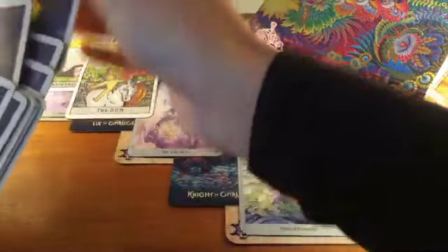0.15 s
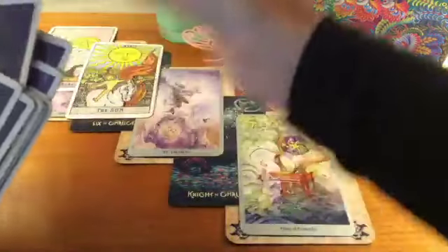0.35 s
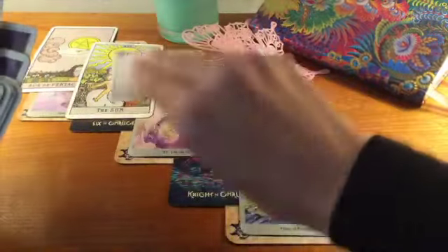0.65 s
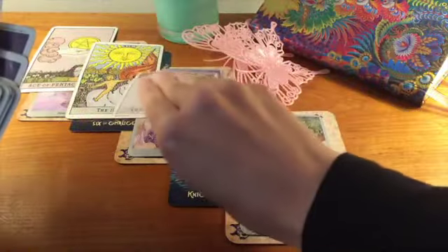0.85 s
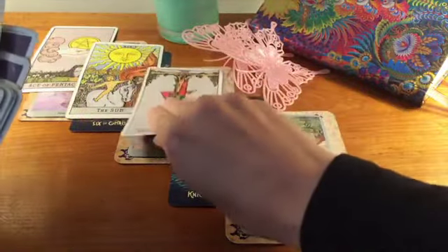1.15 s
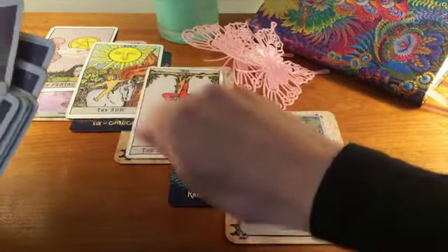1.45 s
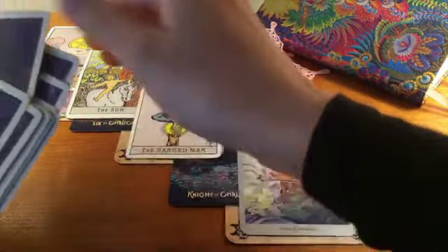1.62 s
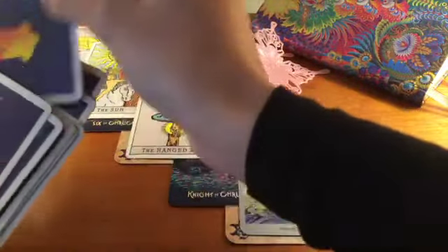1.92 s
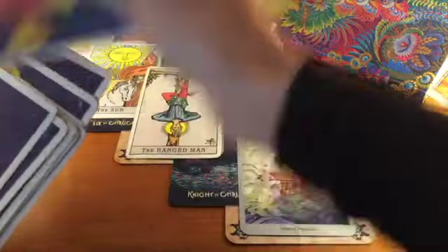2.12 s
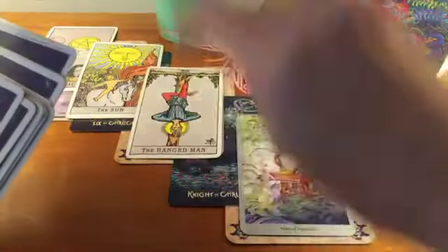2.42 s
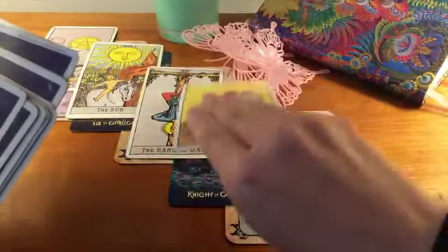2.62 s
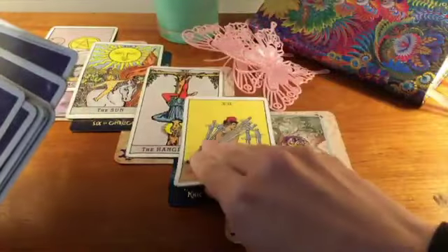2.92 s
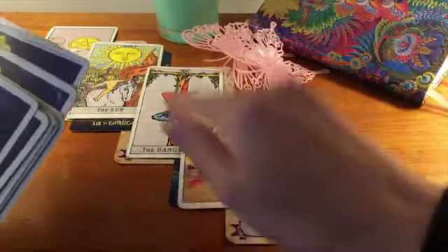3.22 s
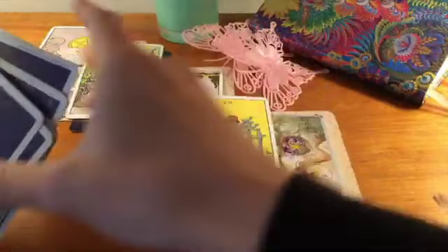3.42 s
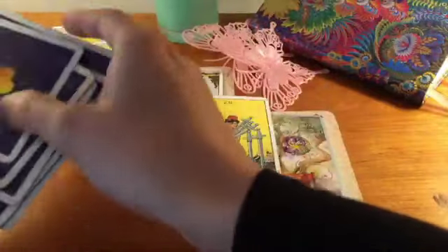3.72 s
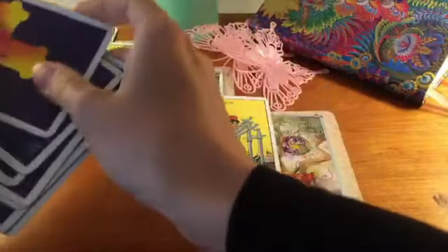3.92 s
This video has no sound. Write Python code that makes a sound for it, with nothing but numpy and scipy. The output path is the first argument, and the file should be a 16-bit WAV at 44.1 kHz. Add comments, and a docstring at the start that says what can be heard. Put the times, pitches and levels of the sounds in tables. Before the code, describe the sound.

Close to the microphone, stiff cards are thumbed off a fanned deck with a grainy rasp and a dull tap on wood. A loud crisp snap follows at about 1.5 seconds, then a fuller double slap near 2.3 and a smaller one near 3.2, with faint slides to the end. Small, nearly dry room; low unsteady hum and soft hiss beneath.

```python
"""A low hum wavers and a faint hiss runs throughout, made of shaped noise, in a small room of delays.
Stiff cards thumbed off a fanned deck rasp over each other in the first half second: dense tiny slips.
Near 1.5 s one snaps free loudly, near 2.3 s a bunch slaps down, near 3.2 s another; fainter slides follow.
Snaps are dying bursts of noise that ring the card; blows ring the wooden table top with a thud."""
import sys
import numpy as np
from scipy import signal
from scipy.fft import rfft, irfft
from scipy.io import wavfile

SR = 44100
rng = np.random.default_rng(int(sys.argv[2]) if len(sys.argv) > 2 else 0)


def ratio(d):
    """dB to gain"""
    e = np.asarray(d, float) / 20
    return 10 ** e


def master(y):
    """Save y as 16-bit WAV."""
    cut = np.clip(np.atleast_2d(y).T, -1, 1)
    pcm = np.round(cut * 32767)  # scale
    wavfile.write(sys.argv[1], SR, pcm.astype(np.int16))


N = 178825   # length in samples


def rms_one(x):
    """Scale a sound to an average (rms) level of 1."""
    return x / np.sqrt(np.mean(x ** 2) + 1e-20)


def in_time(rows):
    """Join the points of a table with straight lines: one curve per column, at every sample."""
    seconds, *columns = np.transpose(rows)
    return np.array([np.interp(np.arange(N) / SR, seconds, column) for column in columns])


def band(x, low_hz, high_hz):
    """Keep only the sound between two pitches."""
    edges = [low_hz, min(high_hz, 0.45 * SR)]
    return signal.sosfilt(signal.butter(2, edges, "band", fs=SR, output="sos"), x)


def ring(x, hz, t60):
    """A resonance: a unit click starts a sine near height 1 that falls 60 dB in t60 seconds."""
    r = ratio(-60 / (max(t60, 0.002) * SR))
    w = 2 * np.pi * hz / SR
    return signal.lfilter([0, np.sin(w)], [1, -2 * r * np.cos(w), r * r], x + 1e-18)


def drift(rate_hz):
    """Random wandering of spread 1: noise smoothed twice, so that little is left above rate_hz."""
    r = np.exp(-2 * np.pi * rate_hz / SR)
    smooth = signal.lfilter([1], [1, -2 * r, r * r], rng.standard_normal(N + SR))
    return rms_one(smooth[SR:])   # the first second lets the filter settle


# Colour of the room tone and hiss.
# Each row: frequency in Hz, relative strength in dB per Hz.
ROOM_COLOUR = [(15, -31), (25, -29), (61, -4), (144, -2), (164, -4), (246, -11), (399, -11), (1050, -22),
               (1850, -21.5), (2060, -23), (6380, -26), (13900, -29.5), (15500, -27.5)]
ROOM_TONE_DB = -62


def room_tone():
    """Steady noise with the colour of the quiet room and the hiss."""
    hz, db = np.transpose(ROOM_COLOUR)
    bins_hz = np.maximum(np.arange(N // 2 + 1) * SR / N, 1)
    strength = ratio(np.interp(np.log(bins_hz), np.log(hz), db))
    noise = irfft(rfft(rng.standard_normal(N)) * strength, N)
    return ratio(ROOM_TONE_DB) * rms_one(noise)


# How loud the hum is, before its random waver.
# Each row: time in seconds, level of the lower band in dB, level of the upper band in dB.
HUM_LEVELS = [(0.0, -72, -59.5), (1.0, -69, -61), (1.4, -58, -57.5), (1.8, -73, -64.5), (2.8, -63, -60),
              (3.299, -68, -70), (3.52, -60, -71), (3.72, -56.5, -77), (3.9, -63, -57.5), (4.05, -73, -65)]
# Where the two hum bands lie.
# Each row: centre in Hz, width of one pass through the resonance in Hz.
HUM_RESONANCES = [(64, 35), (142, 52)]
HUM_WAVER_DB, HUM_WAVER_HZ = 2.5, 3   # spread of the random waver and how fast it moves


def hum():
    """Noise sent twice through each of two low resonances, with a level that wavers."""
    out = 0
    for (hz, width_hz), level_db in zip(HUM_RESONANCES, in_time(HUM_LEVELS)):
        t60 = np.log(1000) / (np.pi * width_hz)   # a narrow resonance rings longer
        level = ratio(level_db + HUM_WAVER_DB * drift(HUM_WAVER_HZ))
        once = ring(rng.standard_normal(N), hz, t60)
        out = out + level * rms_one(ring(once, hz, t60))
    return out


ROOM_T60_S = 0.32     # time for the deep part of the echo to fall 60 dB
WALL_CUT_HZ = 10100   # each round through a delay softens the sound above this


def room(x):
    """Echoes off the walls: twelve feedback delays, duller on every round."""
    out = np.zeros(N)
    dull = np.exp(-2 * np.pi * WALL_CUT_HZ / SR)
    lags = (np.geomspace(0.007, 0.037, 12) * SR).astype(int)   # 7 to 37 ms
    for k, lag in enumerate(lags):
        loop, state = x.copy(), [0.]
        gain = ratio(-60 * lag / SR / ROOM_T60_S)
        for i in range(lag, N, lag):   # one delay length at a time
            back, state = signal.lfilter([gain * (1 - dull)], [1, -dull], loop[i - lag:i], zi=state)
            loop[i:i + lag] += back[:N - i]
        out += (loop - x) * (-1) ** k   # only the echoes, with alternating sign
    return out


# Notes (modes) of the wooden table top.
# Each row: frequency in Hz, relative strength in dB, time to fall 60 dB in seconds.
TABLE_MODES = [(64.3, -3.5, 0.12), (143.3, 1, 0.11), (223, -5, 0.034), (293.4, -4.5, 0.043),
               (400, 0, 0.032), (517.6, -20.5, 0.13)]
# Cards and fingers landing on the wood, before the soft contact dulls them.
# Each row: time in seconds, thud in dB (drives the second mode), knock in dB (drives all the others).
BLOWS = [(0.183, -53, -48), (0.331, -68, -47.5), (0.458, -36.5, -33.5), (0.469, -40, -41.5),
         (1.012, -44.5, -65), (1.419, -50, -74), (1.542, -40.5, -42.5), (2.172, -39.5, -46),
         (2.283, -50, -22.5), (2.314, -37, -36.5), (2.355, -48.5, -44), (2.583, -42.5, -76),
         (2.806, -46.5, -65), (2.926, -53, -51.5), (3.228, -39.5, -38.5), (3.682, -49.5, -58)]
LOWEST_MODE_DB = -19   # drive of the lowest mode, against the knock


def table():
    """Each blow on the wood rings its modes; from the third up they take new strengths each time."""
    seconds, thud_db, knock_db = np.array(BLOWS).T
    out = np.zeros(N)
    change_db = rng.normal(0, 2, (len(seconds), len(TABLE_MODES)))
    for k, (hz, level_db, t60) in enumerate(TABLE_MODES):
        if k == 0:
            blow_db = knock_db + LOWEST_MODE_DB
        elif k == 1:
            blow_db = thud_db
        else:
            blow_db = knock_db + change_db[:, k]
        blows = np.zeros(N)
        blows[np.round(seconds * SR).astype(int)] = ratio(blow_db + level_db)
        if k == 0:   # the heavy lowest mode swells over a few cycles
            blows = 3.3 * np.sin(2 * np.pi * hz / SR) * ring(blows, hz, 0.067)
        out += (-1) ** k * ring(blows, hz, t60)
    soft = signal.lfilter([0.08], [1, -0.92], out)   # a soft contact takes the edge off
    return signal.sosfilt(signal.butter(2, 40.0, "high", fs=SR, output="sos"), soft)


# Notes (modes) that ring briefly in the flexing card.
# Each row: frequency in Hz, relative strength in dB, time to fall 60 dB in seconds.
CARD_MODES = [(880, -73, 0.004), (1320, 6, 0.083), (1800, 23.5, 0.0029), (2620, 2, 0.047), (2990, 2, 0.018),
              (3780, 17.5, 0.0037), (4800, 4, 0.0024), (6650, -19, 0.024)]


def card_modes(x, strengths):
    """The stiff card bends in several modes at once, each ringing at its own pitch."""
    return sum(g * ratio(db) * ring(x, hz, t60) for (hz, db, t60), g in zip(CARD_MODES, strengths))


def colour(direct, modes, flex, share, flex_share):
    """Split contact noise and card ring into rasp, body and hiss; the flexing resonance joins the rasp."""
    sound = rms_one(direct) + share * rms_one(modes)
    rasp = rms_one(band(sound, 1810, 7250)) + flex_share * rms_one(flex)
    body = band(sound, 605, 3450)
    hiss = band(sound, 3490, 13060)
    return [rasp, body, hiss]


def grains(per_s, spread_db):
    """Random micro-slips of uneven size and sign."""
    size_db = spread_db * np.minimum(rng.exponential(1, N), 4)
    sizes = ratio(size_db) * rng.choice([-1, 1], N)
    return sizes * (rng.random(N) < per_s / SR)


# Card sliding over card, one stroke a row.
# Each row: time of the peak in seconds, rasp in dB, swell in seconds, release in seconds,
# brightness in dB, pitch of the card's free flap in Hz.
SLIDE_STROKES = [(0.12, -61.5, .12, 0.055, 8.5, 2900), (0.16, -49.5, 0.06, 0.038, 6.5, 2950),
                 (0.185, -48, 0.055, 0.058, 1.5, 2750), (0.358, -64, 0.013, .015, -8, 3040),
                 (0.425, -43.5, 0.064, 0.052, -0.5, 3280), (0.447, -37, 0.048, .025, -2.5, 3300),
                 (0.468, -33.5, 0.039, 0.016, -5.5, 2290), (0.49, -57.5, 0.023, 0.14, -7, 2390),
                 (0.57, -65, 0.2, 0.34, 6.5, 2260), (0.858, -78, .08, 0.062, 15.5, 2000),
                 (1.44, -71.5, 0.057, 0.11, -11.5, 1800), (1.529, -47.5, 0.044, .012, -5, 1600),
                 (1.539, -41.5, 0.019, 0.0077, 8, 2470), (1.57, -62.5, .03, 0.24, 3.5, 2700),
                 (1.83, -61, 0.023, 0.14, -2, 2890), (1.95, -65, .04, .06, -5, 2620),
                 (2.03, -52, 0.12, 0.093, 3, 3200), (2.148, -55.5, 0.068, .05, -3.5, 2700),
                 (2.173, -46.5, .01, 0.017, -7, 1970), (2.235, -43, 0.055, 0.044, -1.5, 2900),
                 (2.262, -35, 0.048, 0.033, -3.5, 2400), (2.286, -36.5, 0.013, 0.027, -1, 1630),
                 (2.33, -53.5, .03, .2, 1, 1800), (2.85, -70, .03, 0.23, -5, 2500),
                 (3.15, -62.5, 0.12, 0.15, -3, 1900), (3.223, -46.5, 0.036, 0.036, 1, 2190),
                 (3.485, -71, 0.06, 0.044, 14, 2740), (3.61, -72, .05, 0.1, 14.5, 2600),
                 (3.681, -56.5, 0.062, 0.034, 0, 3180), (3.77, -56, 0.1, 0.087, -0.5, 3600),
                 (3.93, -70, 0.2, 0.16, 11.5, 2540), (4.015, -58.5, 0.045, .09, 1, 3580)]
STROKE_RANGE_DB = 30     # level climbed over the swell and lost over the release
STROKE_ROUNDING = 1.33   # 1 = pointed peak, 2 = rounded
SLIDE_BODY_DB, SLIDE_HISS_DB = -6, -5.5   # against the rasp; brightness lifts the hiss, thins the body


def strokes():
    """Each stroke swells as the card speeds up, then lets go; the louder a stroke, the more it sets the pitch."""
    power = np.full((3, N), 1e-14)     # rasp, body, hiss
    pitch = np.full(N, 2500e-14)       # 2500 Hz when nothing slides
    t = np.arange(N) / SR
    for s, db, swell_s, release_s, bright_db, flap_hz in SLIDE_STROKES:
        away = np.where(t < s, (s - t) / max(swell_s, 0.003), (t - s) / max(release_s, 0.003))
        fall_db = STROKE_RANGE_DB * np.minimum(away, 3) ** STROKE_ROUNDING
        rasp = ratio(2 * (db - fall_db))   # twice the dB, since power is added up
        shares = ratio(2 * np.array([0, SLIDE_BODY_DB - bright_db, SLIDE_HISS_DB + bright_db]))
        power = power + shares[:, None] * rasp
        pitch = pitch + flap_hz * rasp
    return np.sqrt(power), pitch / power[0]


def slides():
    """Dense micro-slips, catching unevenly, sound directly, in the card's modes and in its moving free flap."""
    gains, flap_hz = strokes()
    slips = grains(12000, 2.5) * ratio(2.0 * drift(180))
    modes = card_modes(slips, np.ones(len(CARD_MODES)))
    # a narrow band of the slips (300 Hz wide), carried along the flap's unsteady pitch
    unsteady_hz = flap_hz * (1 + 0.11 * drift(34))
    turn = np.exp(2j * np.pi * np.cumsum(unsteady_hz) / SR)
    narrow = signal.lfilter([1], [1, -np.exp(-np.pi * 300.0 / SR)], slips / turn)
    flex = (narrow * turn).real
    layers = colour(slips, modes, flex, 0.16, 0.9)
    return sum(gain * rms_one(layer) for gain, layer in zip(gains, layers))


# Card edges snapping free and slapping down.
# Each row: start in seconds, peak of the rasp in dB, card body in dB against that peak,
# treble in dB against that peak, pitch of the free flap in Hz.
EDGE_SNAPS = [(0.1831, -35.5, -22, -18, 2800), (0.2551, -47, -10, -18, 1900),
              (0.3326, -50.5, 2.5, -14, 1060), (0.385, -42, 1.5, -6, 1160), (0.406, -31, -14, -22, 3660),
              (0.625, -38.5, -9, -15, 2700), (0.9611, -46.5, 3, 5, 1460), (0.967, -59.5, 9.5, -11, 1300),
              (1.0016, -51.5, 7, 10, 2660), (1.107, -51, 2, -10, 1560), (1.5451, -14, -37, -14, 1970),
              (1.8183, -44.5, -9, -16, 1420), (1.8995, -48, 3.5, -21, 1100), (2.0936, -50.5, 3.5, -6, 1420),
              (2.17, -47, 6, -18, 1950), (2.2781, -15.5, -1.5, -10, 2870), (2.2763, -12.5, -2, -5, 1360),
              (2.286, -23, 9.5, -17, 1800), (2.3194, -26, 0.5, -1, 3830), (2.3556, -39.5, -9, -18, 1320),
              (2.8082, -30, -36, -15, 2080), (2.8135, -49, 10.5, -12, 1230), (2.9266, -35, -22, -5, 1320),
              (2.9483, -46.5, -1, -17, 2240), (2.9834, -48.5, -3.5, -15, 2310),
              (3.2248, -23.5, -13, 0, 1950), (3.584, -49, -4, 4.5, 4170), (3.668, -46, -0.5, -1, 1350),
              (3.681, -41, -22, -13, 3260)]
EDGE_T60_S, CRACKLE_T60_S = 0.0017, 0.024   # times to fall 60 dB


def snaps():
    """A sharp edge release with a dying crackle behind it; the card modes take new strengths each time."""
    out = np.zeros(N + SR)
    t = np.arange(SR // 12) / SR
    modes_n = len(CARD_MODES)
    chance = rng.standard_normal((len(EDGE_SNAPS), modes_n + len(t)))
    for (s, peak_db, body_db, hiss_db, flap_hz), draw in zip(EDGE_SNAPS, chance):
        fade = ratio(-60 * t / CRACKLE_T60_S) + 3.06 * ratio(-60 * t / EDGE_T60_S)
        crack = draw[modes_n:] * fade
        modes = card_modes(crack, ratio(3 * draw[:modes_n]))
        flap = ring(crack, flap_hz, 0.008)
        layers = colour(crack, modes, flap, 0.35, 0.52)
        for layer, db in zip(layers, (peak_db, peak_db + body_db, peak_db + hiss_db)):
            out[round(s * SR):][:len(t)] += ratio(db) * layer / np.abs(layer).max()
    return out[:N]


ROOM_DB = -26.5   # gain on the echoes


def scene():
    """Cards and table with their room, over hum and room tone."""
    near = slides() + snaps() + table()
    return (near + ratio(ROOM_DB) * room(near) + hum() + room_tone())[None]


def low_pass(x):
    """Removes everything above the highest recorded frequency."""
    return signal.sosfilt(signal.butter(12, 16390, fs=SR, output="sos"), x)


def record(dry):
    """The microphone drops the deepest bass and the top is cut steeply at 16500 Hz."""
    lean = signal.sosfilt(signal.butter(2, 42.0, "high", fs=SR, output="sos"), dry)
    cut = signal.sosfilt(signal.cheby2(10, 50, 16500, fs=SR, output="sos"), lean)
    return low_pass(cut)


dry = scene()
out = record(dry)
master(out)
```